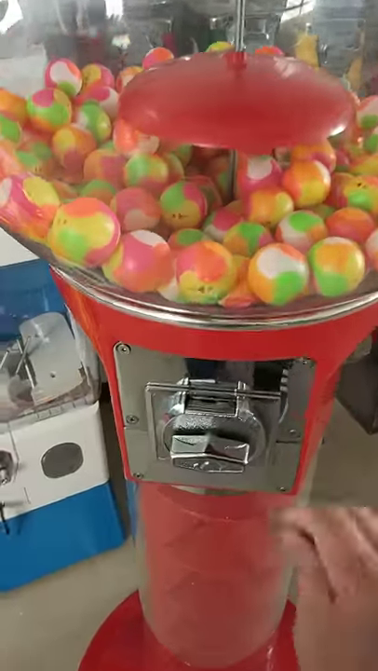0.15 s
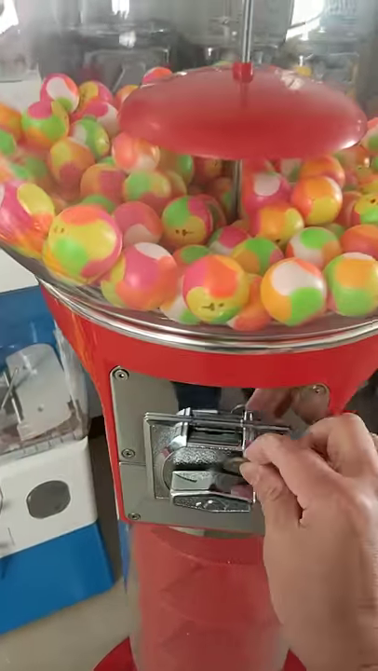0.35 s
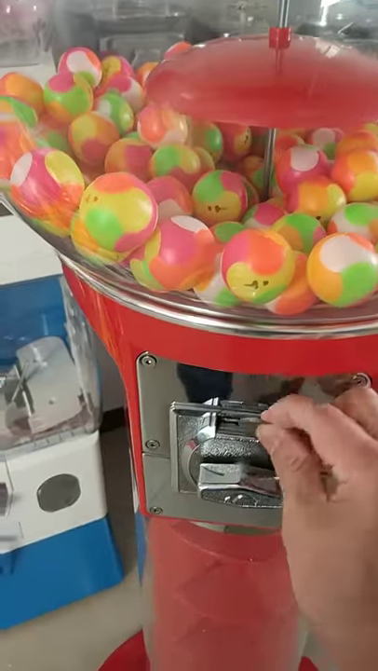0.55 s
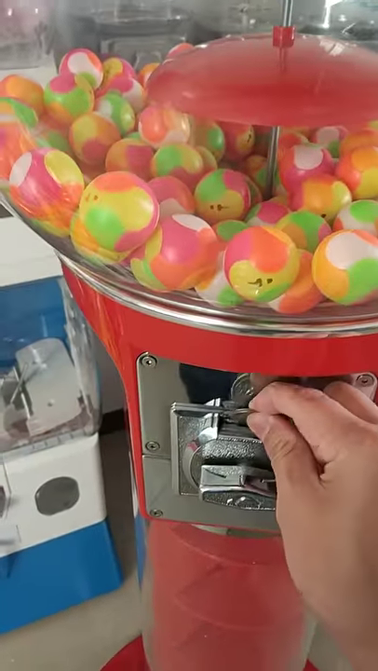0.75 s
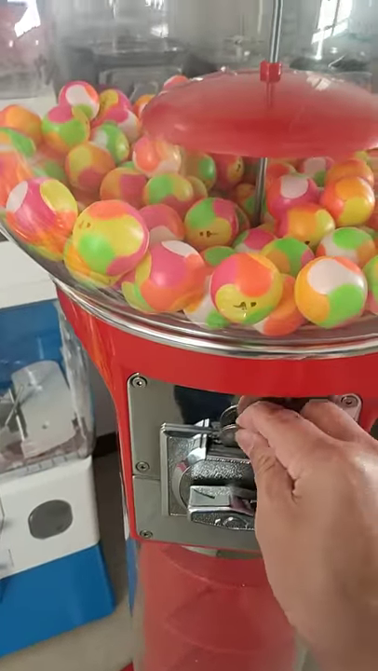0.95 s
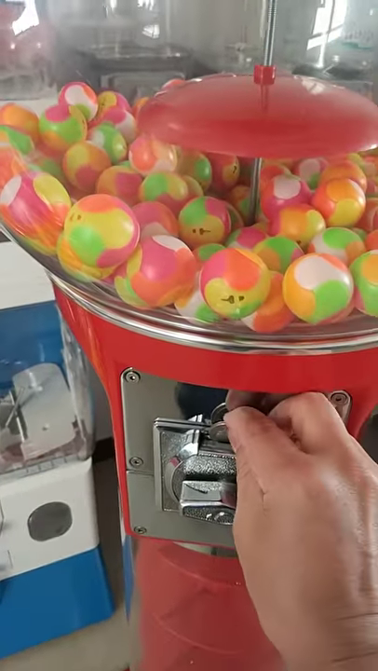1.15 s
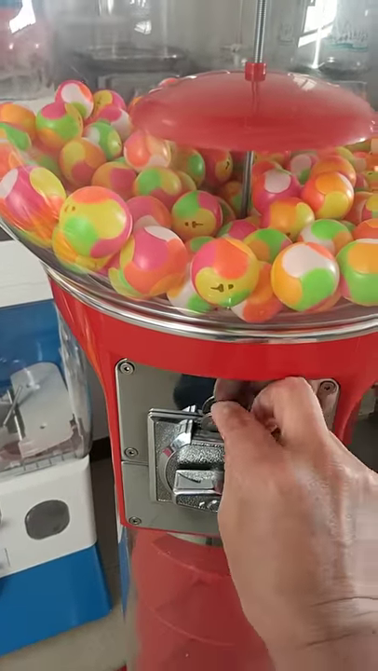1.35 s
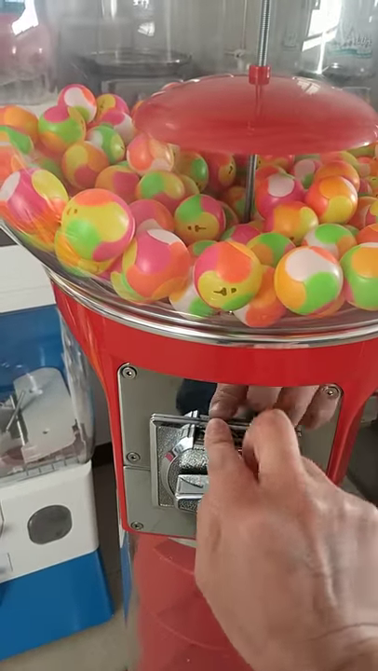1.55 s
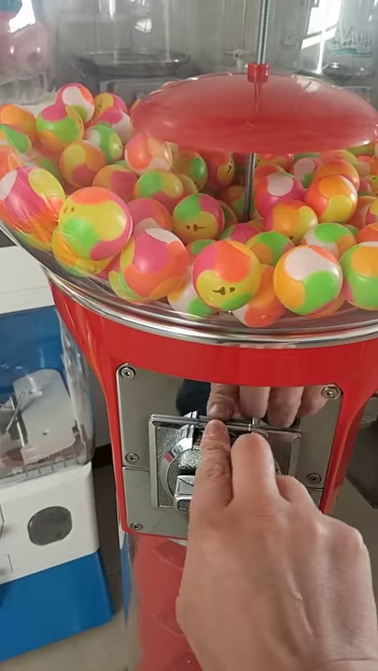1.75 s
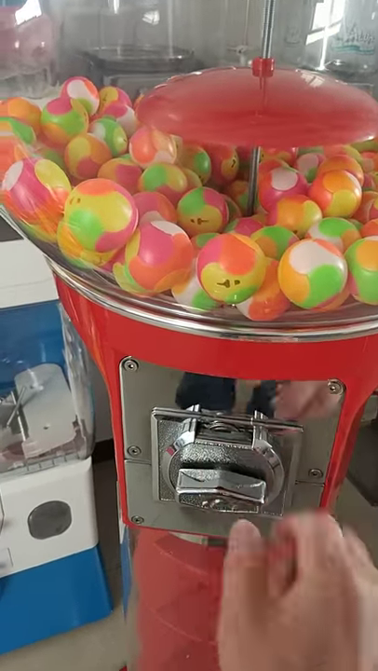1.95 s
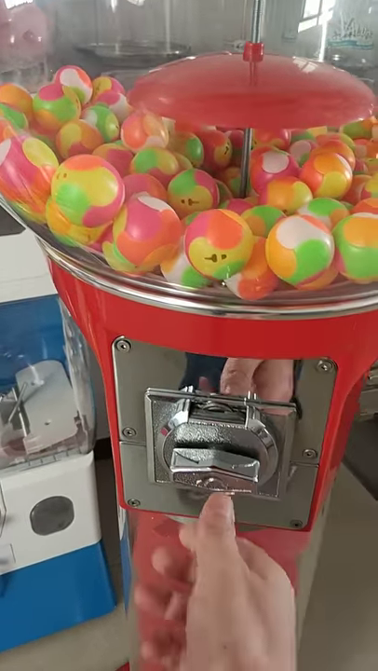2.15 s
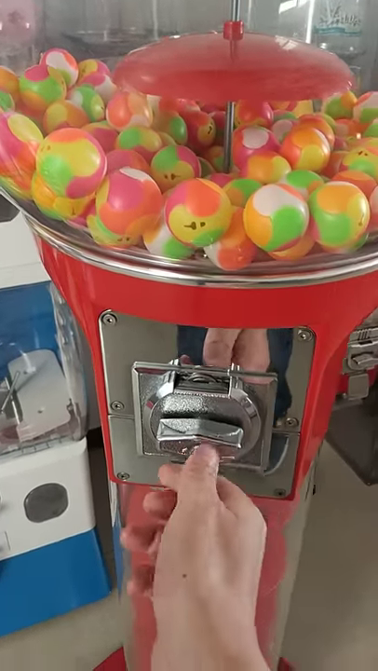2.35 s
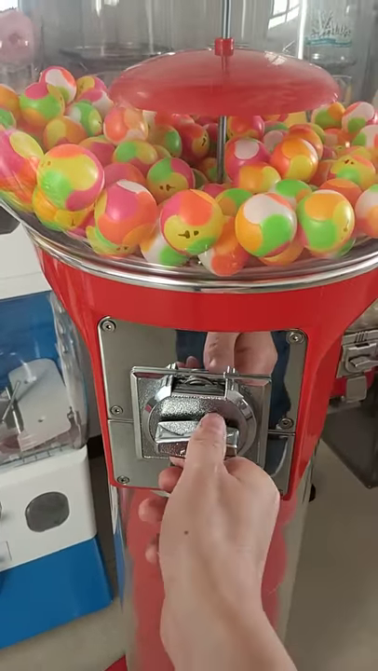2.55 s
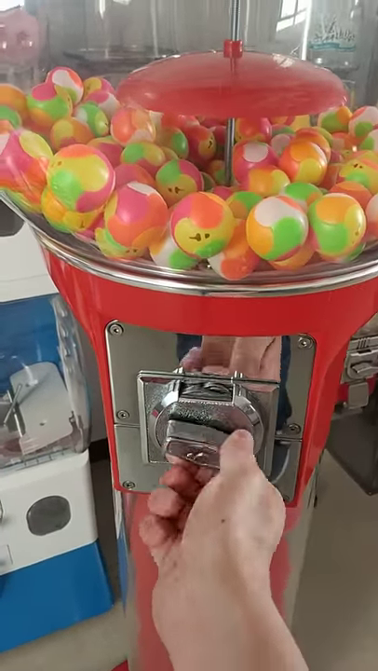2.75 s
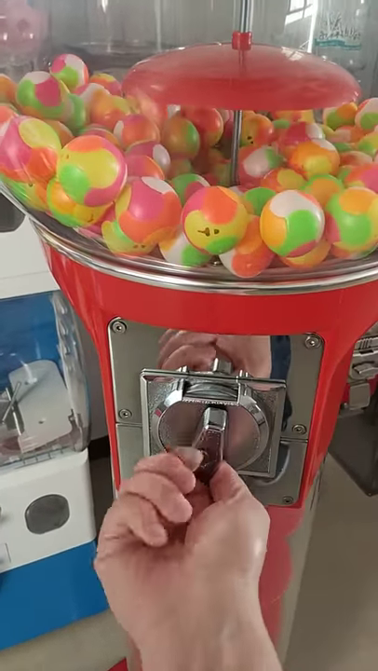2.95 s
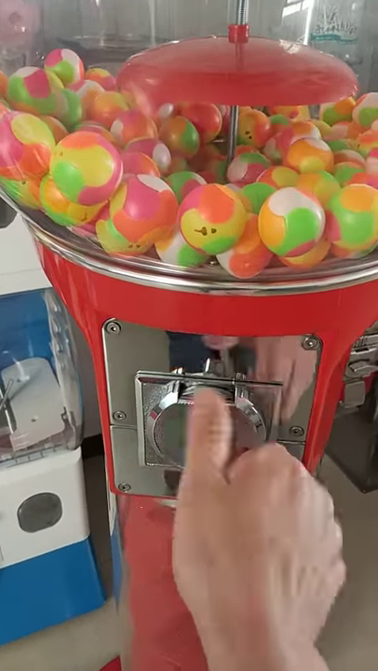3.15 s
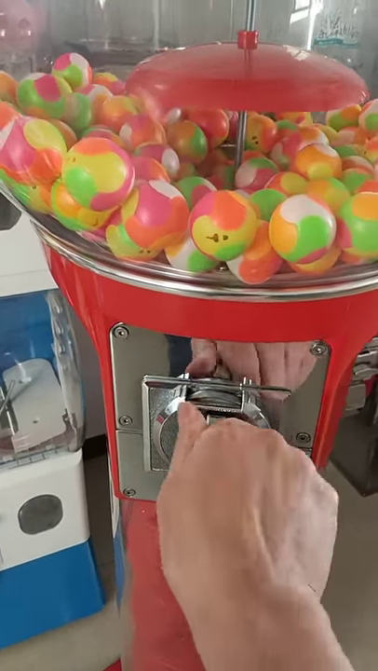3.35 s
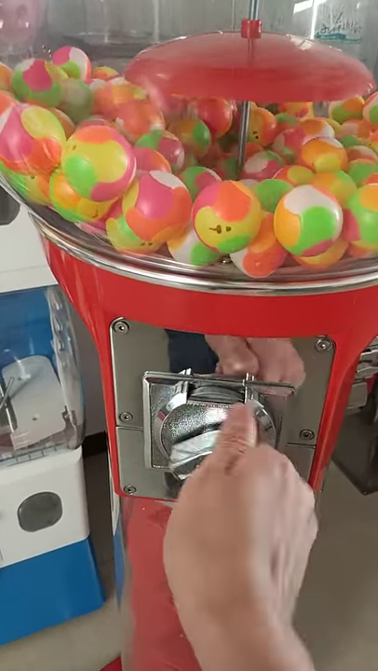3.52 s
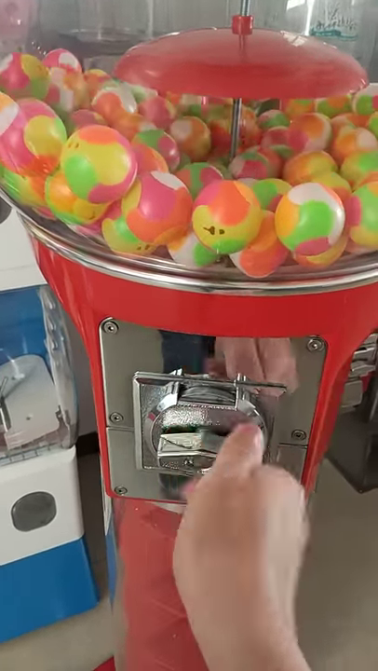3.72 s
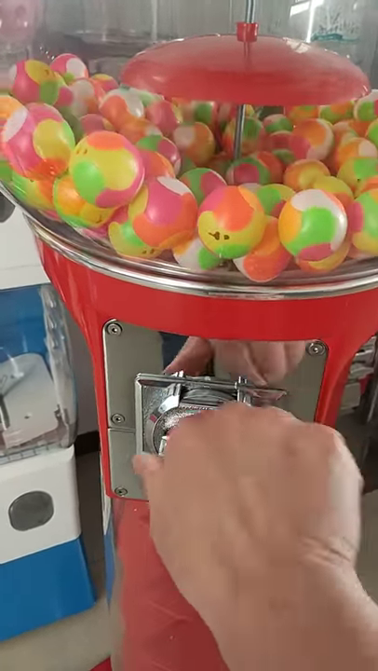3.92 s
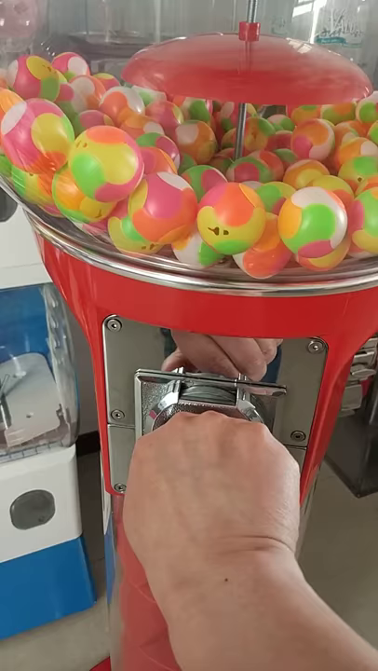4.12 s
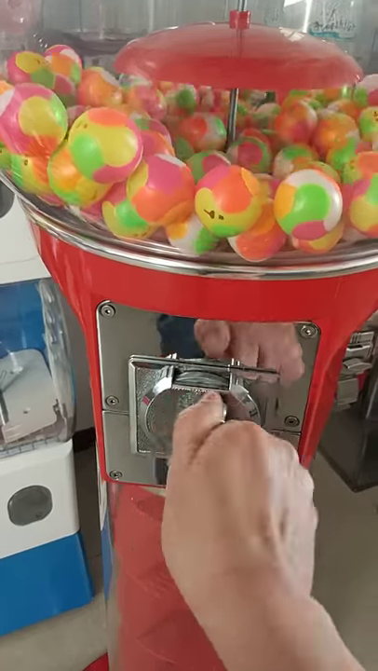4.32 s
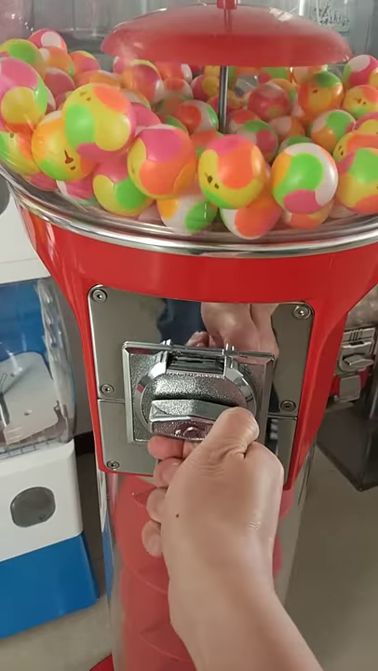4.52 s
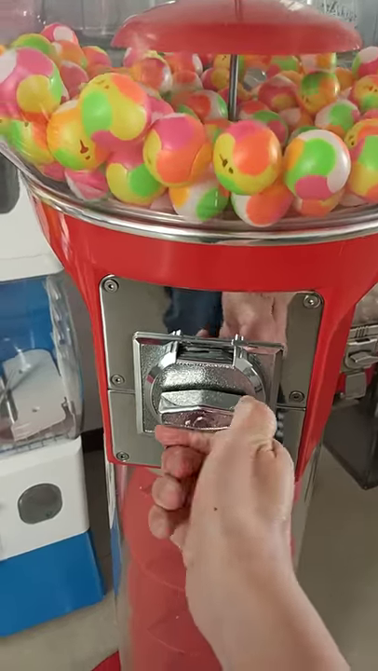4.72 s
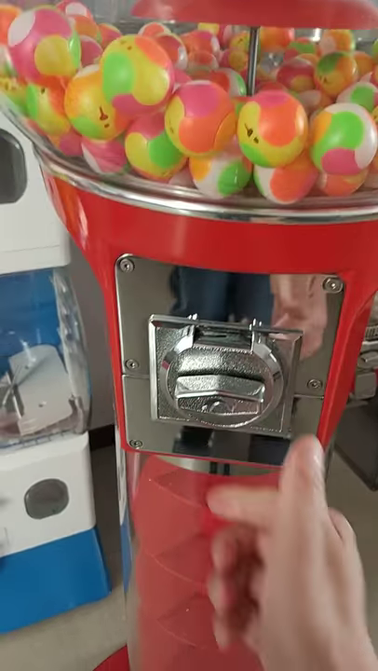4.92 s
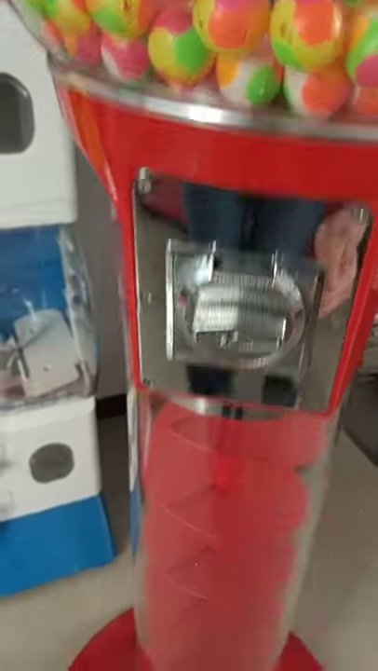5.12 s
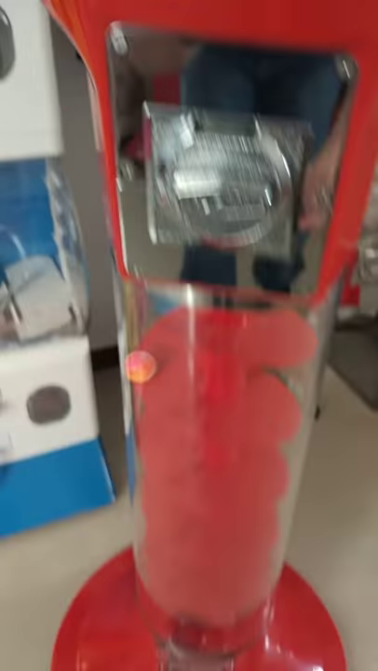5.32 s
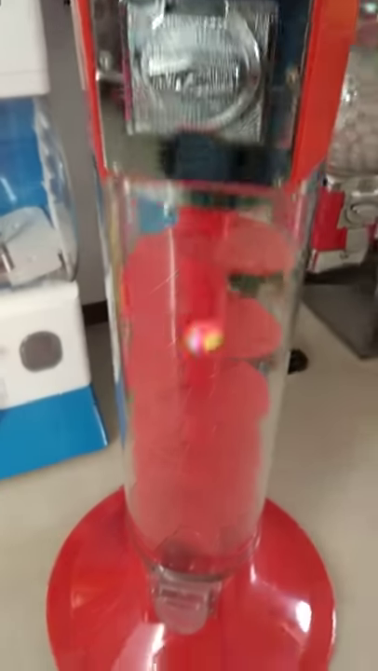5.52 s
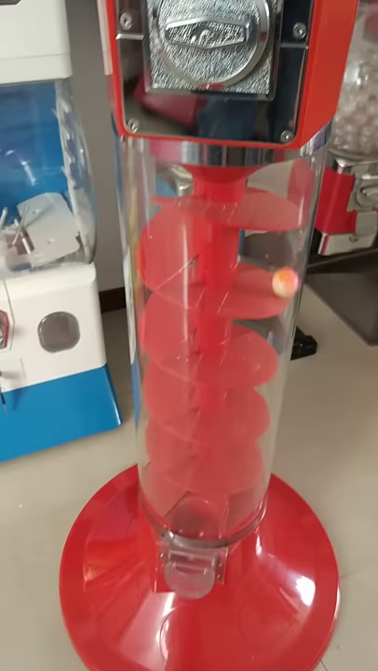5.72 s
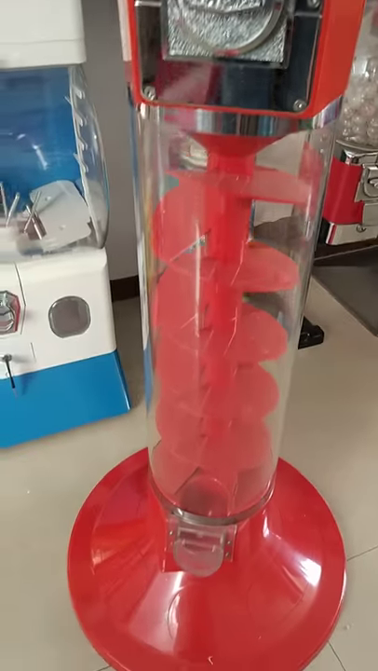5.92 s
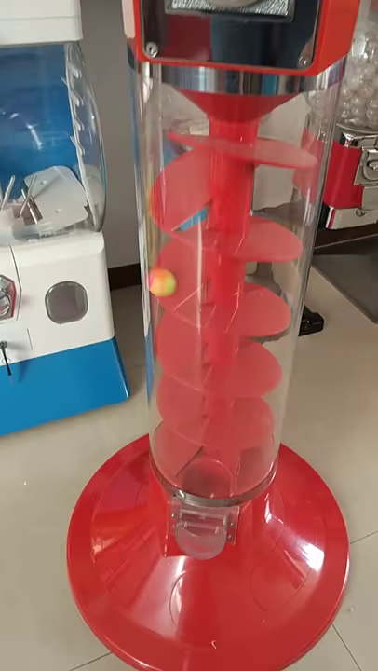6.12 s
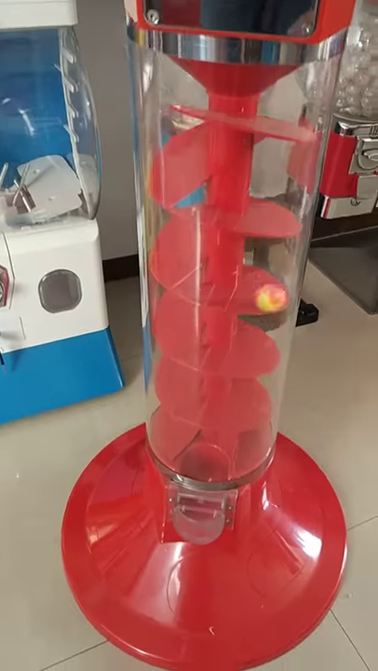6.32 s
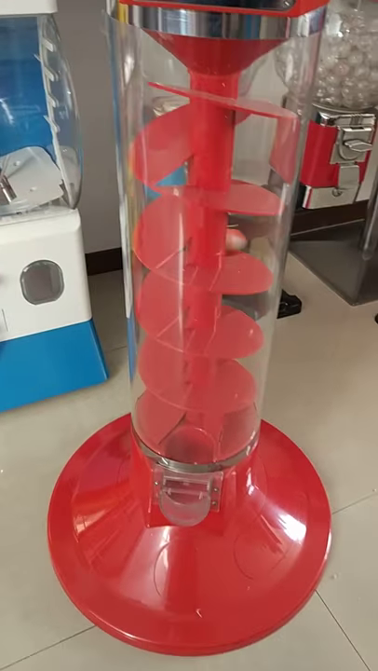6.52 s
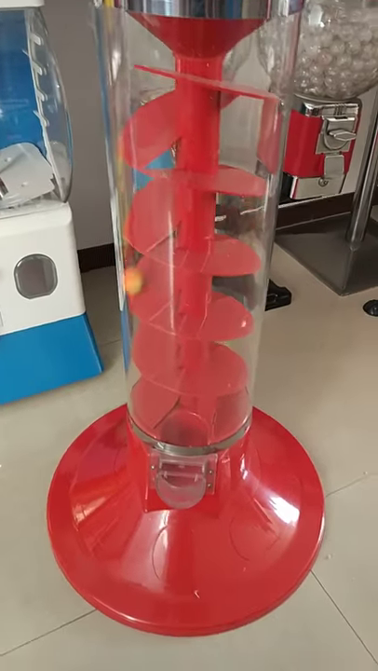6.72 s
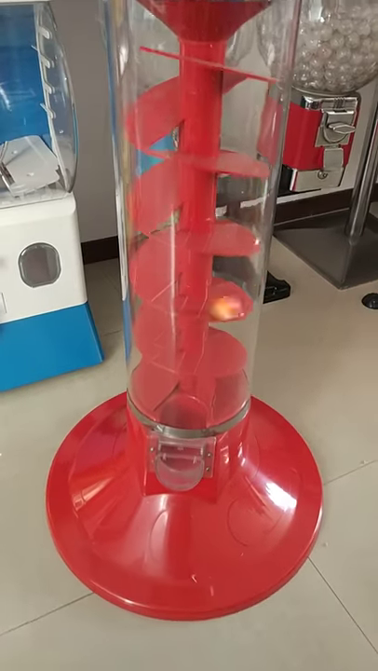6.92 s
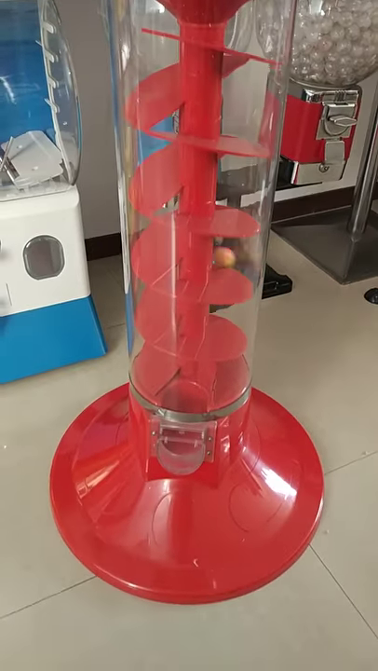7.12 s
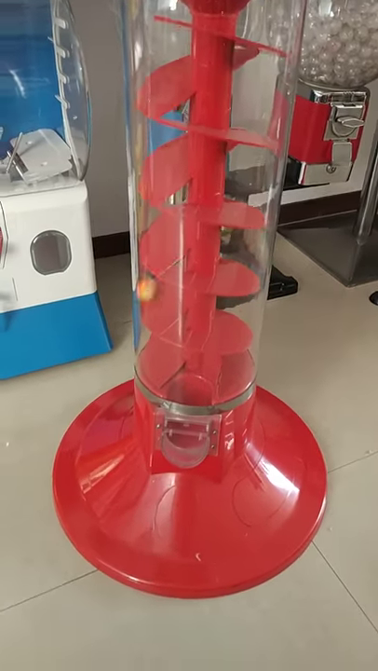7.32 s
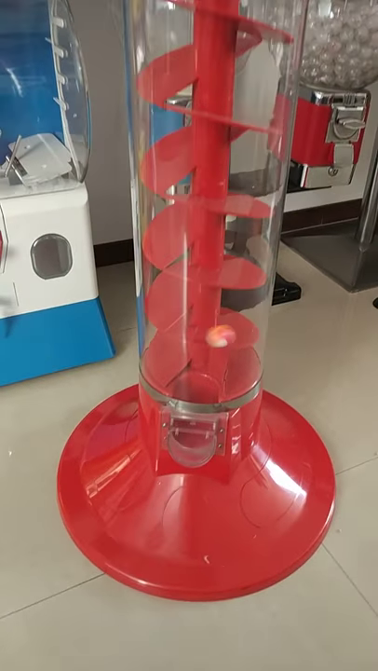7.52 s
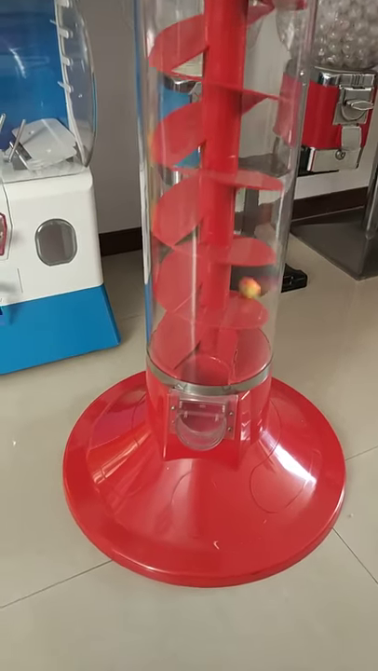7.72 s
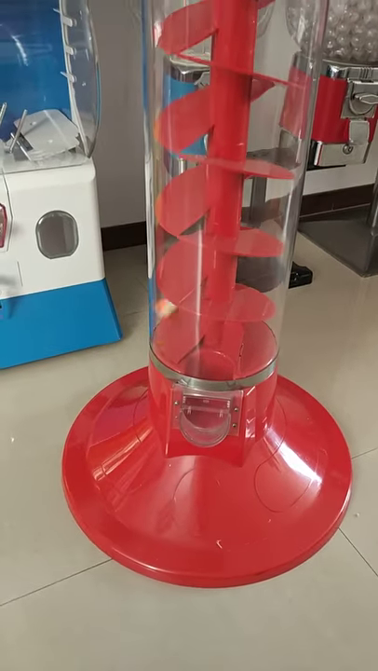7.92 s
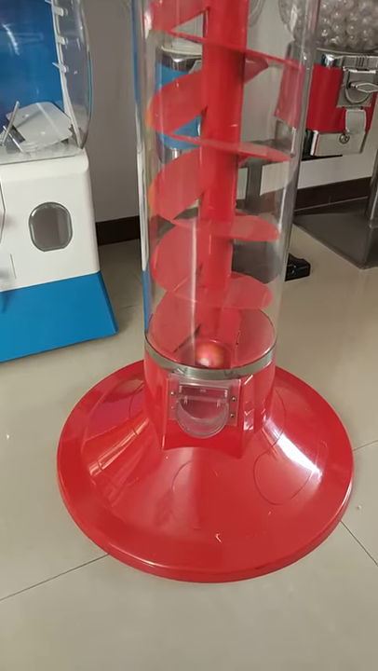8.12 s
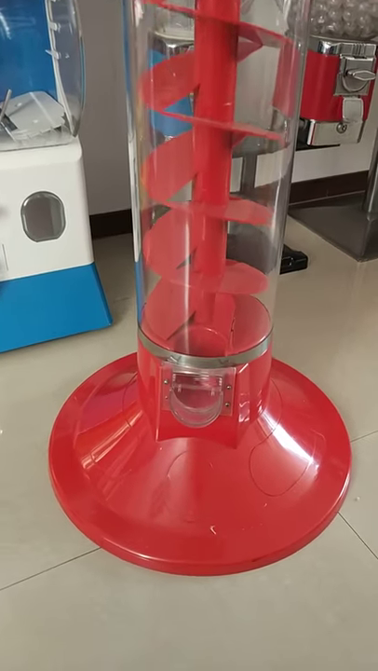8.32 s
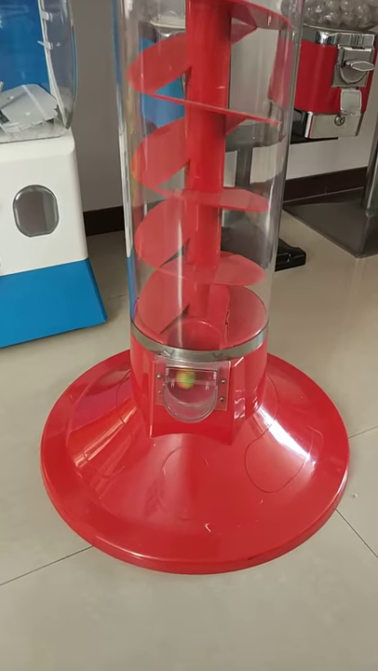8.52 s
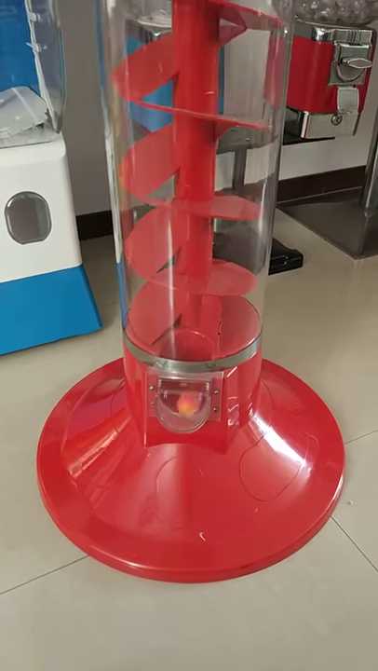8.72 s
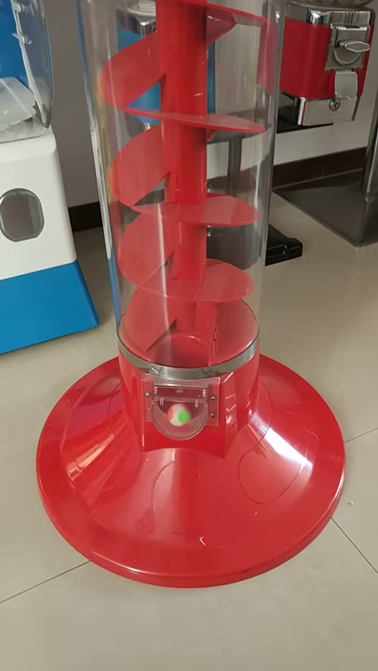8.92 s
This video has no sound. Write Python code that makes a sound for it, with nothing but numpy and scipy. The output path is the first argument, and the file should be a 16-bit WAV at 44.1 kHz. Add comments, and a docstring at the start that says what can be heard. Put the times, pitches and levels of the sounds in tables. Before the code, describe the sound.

A coin clinks into a gumball machine, the handle ratchets loudly, and a ball rattles down a plastic spiral into a metal flap.

```python
"""Spiral gumball machine in a hard showroom

A stereo pair on the machine, the left microphone brighter, the right fuller. A coin clinks and scrapes
into the slot and the handle is wrenched round in three goes: gears grind, the ratchet snaps, balls
tumble in the globe. One ball rolls down the plastic helix and drops against the metal outlet flap.
Behind it are room tone and a swishing sleeve; a limiter squashes the snaps."""
import sys
import numpy as np
from scipy import signal
from scipy.fft import rfft, irfft
from scipy.io import wavfile
from scipy.ndimage import uniform_filter1d, minimum_filter1d

SR = 44100
rng = np.random.default_rng(int(sys.argv[2]) if len(sys.argv) > 2 else 0)


def unload_wav(signal):
    """Save mono or channel-first audio to the path in sys.argv[1] as 16-bit WAV at rate SR, clipped to [-1, 1]."""
    wavfile.write(
        sys.argv[1],
        SR,
        np.round(np.clip(np.atleast_2d(signal).T, -1, 1) * 32767).astype(np.int16),
    )


N = 395136

# The showroom's reverberation. Each row: frequency in Hz, seconds to die by 60 dB.
ROOM_T60 = [(200, 0.37), (600, 0.33), (1500, 0.37), (4000, 0.33), (10000, 0.34), (16000, 0.23)]
# How alike the two microphones hear. Each row: frequency in Hz, left-right correlation.
MIC_CORRELATION = [(150, 0), (400, 0.66), (900, 0.1), (2000, 0), (16000, 0)]
# The tilt between the microphones. Each row: frequency in Hz, left over right in dB.
MIC_BALANCE = [(250, -4), (800, -2.5), (2000, 2), (7500, 0), (11000, 8.5), (15000, 10)]

# Spectra of the hush, cloth, rolling and rubbing. Each row: frequency in Hz, relative density in dB.
AIR_COLOUR = [(59, -64), (100, -19.5), (215, 2), (335, -3), (406, -3.5), (452, -6), (547, -6.5), (891, -4),
              (1200, -13.5), (16000, -24)]
SWISH_COLOUR = [(300, 1), (1500, 1.5), (3500, 7.5), (6000, 2.5), (10000, 8), (13000, 2.5), (16000, 0.5)]
ROLL_COLOUR = [(170, -2.5), (260, 0), (800, 1), (1800, -3), (3300, -3), (5000, -22), (9800, -6.5),
               (16000, -17)]
RATTLE_COLOUR = [(1500, -23), (3800, 0), (5200, 5), (7200, 7), (9800, 10.5), (11500, -4), (12800, 7),
                 (14200, -11), (15500, -17)]
SCRAPE_COLOUR = [(300, -33), (600, 6), (2300, 1), (2800, 3.5), (4200, -1), (5400, -2), (6300, -6),
                 (8300, -10), (10500, -1.5), (16000, -13)]
GRIND_COLOUR = [(88, -12.5), (150, -52), (226, -4.5), (566, -2.5), (1940, -19), (2180, -15), (4080, -23.5),
                (12700, -29.5), (16000, -37)]
# The tone of a blow on each part. Each row: frequency in Hz, gain in dB.
PLASTIC_COLOUR = [(220, -16.5), (600, -6.5), (1800, -5.5), (2900, -1.5), (4800, -5), (7000, 0),
                  (10000, -0.5), (15500, -6.5)]
METAL_COLOUR = [(250, 3), (600, 0.5), (1500, 2.5), (3000, 1), (5000, -2), (9500, 0), (12000, 0.5),
                (13800, -6), (15500, 0)]
HOUSING_COLOUR = [(200, -2), (450, -2), (800, -7.5), (1500, 5), (4000, -9.5), (9500, -10), (15500, -24)]
PAWL_COLOUR = [(250, -3), (1000, 2.5), (1900, 1), (3000, 2), (4800, 0.5), (7300, 0.5), (8400, 3), (9600, 4),
               (12500, 1), (14300, -3.5), (15500, -1)]

# Where each part rings. Each row: frequency in Hz, width in Hz, gain in dB.
HELIX_MODES = [(554, 30, -5), (790, 60, -9), (1200, 100, -0.5), (1420, 140, -13), (2450, 700, -6.5),
               (3040, 500, -6), (3510, 260, -5)]
FLAP_MODES = [(800, 100, 5), (1070, 160, 5), (2160, 360, 4), (2950, 300, -8), (4110, 160, -2),
              (6150, 330, 4.5), (8000, 470, 6.5), (9700, 540, -2), (12550, 400, 11.5), (13600, 400, 8),
              (15050, 800, 10)]
COIN_MODES = [(5070, 260, 4.5), (5960, 190, 0), (8753, 40, -17), (10300, 400, -4), (12500, 220, -4),
              (15050, 350, 1)]
SLOT_MODES = [(2350, 300, 0), (5030, 200, 7), (5360, 165, 13), (9050, 450, 3), (10400, 400, 3),
              (11420, 180, 12), (12080, 240, 8), (15050, 350, 3)]
SLOT_LIP_MODES = [(3320, 270, 3), (4120, 690, 10.5), (6240, 220, 14.5)]
SQUEAL_MODES = [(9700, 250, -4), (10850, 360, -2), (12700, 350, -4), (14900, 410, -2)]
GLOBE_MODES = [(1030, 130, 4), (1585, 71, 8), (2190, 110, 0), (2680, 90, 0), (2800, 89, -23),
               (3110, 17, -7)]
HOUSING_MODES = [(240, 50, -11), (294, 120, -15), (456, 8.7, 2), (570, 12, 4.5), (850, 16, 3)]
STOP_MODES = [(222, 5, 26), (326, 7, 21), (355, 7, 21), (1210, 78, 2.6)]
PAWL_MODES = [(1085, 55, -6), (2400, 320, -4), (7240, 510, -8.5), (10600, 400, -11)]

# The sleeve moves. Each row: middle in seconds, length in seconds, level in dB.
SWISHES = [(0.228, 0.94, -60), (5.176, 0.68, -49.5), (5.92, 0.58, -48.5), (6.83, 0.47, -44.5),
           (7.352, 0.25, -44.5), (8.95, 0.36, -50)]
# The ball hops down the helix and settles; it strikes the flap; the handle meets its stop. Each row:
# start in seconds, strength, bass and treble in dB, strongest resonance in Hz, its prominence in dB.
BALL_HOPS = [(4.973, -6, -13.5, -13.5, 762, 3), (5.235, -2, -10, -16.5, 2960, 0),
             (5.248, -12.5, -9, -8.5, 3000, 3), (5.5125, -7.5, -17, -13.5, 1270, 11),
             (5.577, -3.5, -36, -35, 3060, 5), (5.868, -12.5, -23, -21, 3050, 11),
             (5.926, -9.5, -6.5, -27, 1160, 20), (5.962, -6.5, -12, -13, 1130, 6),
             (6.041, -8, -32, -30, 3230, 17), (6.2835, -1.5, -10, -18, 3487, -4),
             (6.302, -9, -12, -10, 10300, 15), (6.328, -10.5, -17, -13, 3200, 3),
             (6.402, -9.5, -15, -5.5, 3770, -9), (6.478, -17, -8, -8, 9900, 0),
             (6.545, -15, -19, -15, 9500, -2), (6.6, -10.5, -16, -15, 1160, 4),
             (6.922, -7.5, -23, -21, 1195, 23), (7.1363, -12, -6, -18, 1170, 27),
             (7.1669, -7, -22, -13, 3130, 19), (7.3, -12.5, -18, -6, 3420, 3),
             (7.5306, -3, -15, -22, 1200, 7), (7.59, -4, -32, -13.5, 4120, 26),
             (7.858, -9, -20, -16, 3420, 4), (7.88, -2, -22, -12.5, 3000, 4),
             (7.912, -1, -17, -21, 1260, 3), (7.933, -15, -16, -22, 1260, 18),
             (7.968, -3.5, -17, -30, 3420, 11), (7.9872, -6, -20, -13, 1060, 22),
             (8.0292, -7, -18, -6, 9100, 25), (8.1013, -6.5, -8.5, -12, 9500, 3),
             (8.171, -6.5, -11, -5.5, 9600, 16), (8.475, -10, -14, -17, 2120, 8),
             (8.506, -15.5, -26, -16, 4130, 9), (8.649, -13, -12, -17, 4720, -3),
             (8.796, -10, -18, -16, 5780, 13), (8.802, -8.5, -14.5, -10.5, 2390, 8),
             (8.927, -17, -15, -20, 2400, 4)]
FLAP_HITS = [(8.2053, 1, -18.5, -5, 3300, 4), (8.302, 5.5, -20.5, -7.5, 4150, 12)]
STOP_HITS = [(4.648, 13, -31, -7, 1150, 14), (4.654, 5.5, -24, -0.5, 9960, 12),
             (4.662, -2, -25, 4, 12400, 9), (4.693, 3.5, -38, -12, 1210, 5)]
# The coin clinks against the slot. Each row: start in seconds, strength, bass and treble in dB,
# strongest resonance in Hz, its prominence in dB, chatter in seconds.
COIN_CLINKS = [(0.3322, -11, -10.5, 5, 8700, 18, 0.0036), (0.3693, -9, -13, 3, 8750, 9, .002),
               (0.375, -5, -22, -7, 3700, 10, 0.0044), (0.404, 8.5, -12.5, -13, 1180, 6, 0.0018),
               (0.414, 2, -9, -13, 1500, 1, .008), (0.523, -9, -34, 7, 6440, 20, 0.0025),
               (0.549, -15, -32, 3, 11100, -3, 0.00088), (0.631, -11, -15, -20, 2590, -1, 0.0033),
               (0.7363, -8, -16, -15, 2530, -2, 0.0053), (0.8154, -4, -22, -4, 6280, 27, 0.0026),
               (0.832, -7.5, -29, -11.5, 5000, 7, 0.0022), (0.844, -4.5, -16.5, -25, 2630, 5, 0.0034),
               (1.8593, -14.5, -7, -11.5, 2000, 2, 0.0027)]
# The coin is pressed along the plate, ever harder until it slips free.
# Each row: start and length in seconds, final level in dB, swell in dB, squeal against rub in dB.
COIN_SCRAPES = [(0.426, 0.083, -38, 3, -11), (0.509, 0.045, -33, 4, -2.5), (0.826, 0.039, -47, 4, -28),
                (1.566, 0.017, -31.5, 17, -14)]
# The coin glances off the slot wall, then lands. Each row: start in seconds, strength in dB.
COIN_DROP = [(1.5842, -11), (1.5889, -3)]
# Balls fall against each other in the globe.
# Each row: start in seconds, strength, bass and treble in dB, strongest resonance in Hz.
GLOBE_FALLS = [(3.7745, 10.5, -6.5, -18, 1530), (3.802, 19.5, -26, -16, 2870),
               (3.8221, 16.5, -37, -16, 2970), (3.836, 14.5, -34, -15, 2950),
               (3.8795, 10.5, -28, -38, 2040), (3.905, 8, -15, -36, 2650), (3.926, 3, -11, -32, 2900),
               (3.9668, 4, -9.5, -20.5, 1060), (4.045, 11.5, -17.5, -15, 1770), (4.051, 10, -13, -20, 2000),
               (4.0573, 12, -7.5, -23, 2330), (4.1321, 17, -15, -12, 2420), (4.81, -0.5, -10, -13.5, 2380)]
# The hand loads the gears until they give. Each row: start, loading time and length in seconds, peak in dB.
HANDLE_TURNS = [(2.779, 0.18, 0.31, -29), (3.531, 0.065, 0.2, -28.5), (4.257, 0.027, 0.34, -27)]
# Fingers, loose handle and gears knock on the housing.
# Each row: start in seconds, strength in dB, hardness in dB (flesh below 0, steel above).
HOUSING_KNOCKS = [(0.403, 6, -8), (0.957, -12.5, -1.5), (1.5352, -13, 0), (2.3478, -15, -3.5),
                  (2.4048, -26.5, -11.5), (2.551, -13, -3.5), (2.7278, -21.5, -16), (2.807, -13.5, 4.5),
                  (2.842, -22, 4), (2.863, -6.5, -0.5), (2.88, -9, -11.5), (2.93, 3.5, 1), (3.3661, -1, -6),
                  (3.4862, -15, -6), (3.537, -10.5, -3), (3.5555, -3, -3), (3.783, 15, -3.5),
                  (4.2527, 0, -6), (4.2848, 4, -1.5), (4.293, 5, -2), (4.4491, 5, -3), (4.5, -3.5, 2),
                  (4.763, -6.5, -2.5)]
# The pawl snaps over the ratchet teeth. Each row: start in seconds, strength in dB, left over right
# in dB, strongest resonance in Hz, its prominence in dB, chatter in seconds.
PAWL_SNAPS = [(2.9585, 24, -1.5, 7040, -2, 0.0014), (2.9916, 23.5, -5.5, 12200, -11, .003),
              (3.6257, 21, -2, 9500, -6, 0.0023), (3.6376, 24, -5, 9400, 1, .002),
              (4.3097, 26.5, -9, 9400, 1, 0.0027), (4.3256, 26.5, -0.5, 11100, 0, 0.0035),
              (4.5595, 27.5, -2, 13200, 0, 0.0029)]


def amp(db):
    return 10 ** (np.asarray(db) / 20)


def unit_rms(x):
    return x / np.sqrt(np.mean(x ** 2) + 1e-20)


def curve_at(points, hz):
    """A curve's value, its points joined on a log-frequency axis."""
    point_hz, value = np.transpose(points)
    return np.interp(np.log(hz + 1), np.log(point_hz), value)


def panned(x, left_db):
    return x * amp([[left_db / 2], [-left_db / 2]])


def add(mix, start_s, sound):
    part = mix[:, max(round(start_s * SR), 0):][:, :sound.shape[1]]
    part += sound[:, :part.shape[1]]


def impulse(start_s, db=0):
    """One sharp push, alike in both channels."""
    push = np.zeros((2, N))
    add(push, start_s, np.full((2, 1), amp(db)))
    return push


def coloured(x, colour, size=4096):
    """Minimum-phase filter with the given spectrum."""
    hz = abs(np.fft.fftfreq(size, 1 / SR))
    log_gain = np.log(amp(np.maximum(curve_at(colour, hz), -100)))
    taps = np.fft.ifft(np.exp(np.conj(signal.hilbert(log_gain)))).real
    return signal.oaconvolve(x, taps[None, :size // 2], axes=1)[:, :x.shape[1]]


def resonances(x, modes):
    """What the given modes sing when x drives them."""
    return sum(amp(db) * signal.lfilter(*signal.iirpeak(hz, hz / width, SR), x + 1e-15)
               for hz, width, db in modes)


def stereo_noise(size=N, envelope=1):
    """Noise at the pair: partly shared in the low mids, independent in the treble."""
    mid, side = rfft(envelope * rng.standard_normal((2, size)))
    correlation = curve_at(MIC_CORRELATION, np.fft.rfftfreq(size, 1 / SR))
    mid, side = mid * np.sqrt((1 + correlation) / 2), side * np.sqrt((1 - correlation) / 2)
    return irfft([mid + side, mid - side], size)


def slips(per_s, spread_db, contact_s):
    """Tiny random catches of one surface on another, a few of them large."""
    sizes = amp(spread_db * np.minimum(rng.exponential(1, N), 4))
    catches = sizes * (rng.random(N) < per_s / SR)
    power = signal.oaconvolve(catches ** 2, np.exp(-np.arange(512) / SR / contact_s))[:N]
    return stereo_noise(envelope=np.sqrt(abs(power)))


def stroke(start_s, rise_s, length_s, peak_db, swell_db, ease_db_per_s, release_db_per_s):
    """Gain of one rubbing stroke: it swells to its peak, eases, and dies quickly once let go."""
    t = np.arange(N) / SR - start_s
    climb_db = -swell_db * np.clip(1 - t / rise_s, 0, 1)
    fall_db = ease_db_per_s * np.maximum(t - rise_s, 0) + release_db_per_s * np.maximum(t - length_s, 0)
    return (t >= 0) * amp(np.maximum(peak_db + climb_db - fall_db, -150))


def blows(colour, start_s, db, bass_db, treble_db, ring_hz, ring_db, chatter_s=0, *,
          left_db, decay_s, bass_extra_s, width_hz):
    """Each blow is a brief clatter of crowded modes; where it lands decides which one stands out."""
    t, out = np.arange(6000) / SR, np.zeros((2, N))
    bands = [signal.butter(3, edges_hz, "band", fs=SR, output="sos")
             for edges_hz in ((190, 855), (950, 4200), (5200, 14750))]
    decays_s = (decay_s + bass_extra_s, decay_s * 1.74, decay_s)
    rows = np.broadcast(start_s, db, bass_db, treble_db, left_db, ring_hz, ring_db, chatter_s)
    for start, strength, bass, treble, left, hz, prominence, chatter in rows:
        noise, clatter = stereo_noise(len(t)), 0
        for band, band_db, tau in zip(bands, (bass, -8, treble), decays_s):
            envelope = np.exp(-np.maximum(t - chatter, 0) / tau)
            burst = signal.sosfilt(band, noise * envelope + 1e-15)
            burst += resonances(burst, [(hz, width_hz, prominence)])
            clatter += amp(band_db) * burst / np.linalg.norm(burst, axis=1, keepdims=True)
        add(out, start, panned(amp(strength) * clatter, left))
    return coloured(out, colour)


def showroom(x, wet_db, left_db, t60_share=1, drift_s=1.3):
    """Adds the room's dense reflections; hand, ball and listener move, so two tails trade places."""
    source = x.sum(0, keepdims=True) / np.sqrt(2)
    drift = 2 * np.pi * np.arange(N) / SR / drift_s
    for share in (np.cos(drift), np.sin(drift)):
        hz, t, spectrum = signal.stft(stereo_noise(32768), SR, nperseg=256)
        decay = amp(-60 * t / t60_share / curve_at(ROOM_T60, hz)[:, None])
        tail = signal.istft(spectrum * decay, SR, nperseg=256)[1]
        tail *= 1 - np.exp(-(np.arange(tail.shape[1]) / SR / 0.0024) ** 2)  # reflections build up
        echo = signal.oaconvolve(share * source, tail / np.linalg.norm(tail[0]), axes=1)[:, :N]
        x = x + panned(amp(wet_db) * echo, left_db)
    return x


def room_tone(level_db=-57):
    """The steady hush of the showroom."""
    return panned(amp(level_db) * unit_rms(coloured(stereo_noise(), AIR_COLOUR)), left_db=1)


def sleeve():
    """Off to the left, smooth cloth slides on itself in soft swells."""
    t = np.arange(N) / SR
    swell = sum(amp(db) * np.exp(-((t - middle) / (length / 4.64)) ** 2)
                for middle, length, db in SWISHES)
    return panned(swell * unit_rms(coloured(stereo_noise(), SWISH_COLOUR)), left_db=6)


def rolling(start_s=5.17, outlet_s=8.17, gather_s=0.57, entry_speed=0.15, run_out_db_per_s=72):
    """The ball rumbles down the helix, gathering speed and rattling more brightly as it goes."""
    t = np.arange(N) / SR
    speed = 1 - (1 - entry_speed) * np.exp(-np.maximum(t - start_s, 0) / gather_s)  # top speed is 1
    on_helix = (t > start_s) * amp(-run_out_db_per_s * np.maximum(t - outlet_s, 0))
    rumble = unit_rms(coloured(slips(per_s=340, spread_db=7.5, contact_s=0.0019), ROLL_COLOUR))
    # each small bump wakes a different mode of the spiral
    hollow = unit_rms(sum(resonances(slips(per_s=42, spread_db=3, contact_s=0.0012), [mode])
                          for mode in HELIX_MODES))
    # the ball wobbles, so its rumble swells and its ticks come in clusters
    wobble = unit_rms(uniform_filter1d(rng.standard_normal(N), size=2000))
    body = amp(-53.5 + 1.1 * wobble) * (0.7 * rumble + hollow)
    ticks = amp(2 * wobble) * slips(per_s=70, spread_db=3, contact_s=0.0005)
    rattle = amp(-52 + 4.5 * (t - outlet_s)) * unit_rms(coloured(ticks, RATTLE_COLOUR))
    # the hollow housing drones, less as the ball descends away from it
    drone = amp(-61 - 1.5 * (t - start_s)) * unit_rms(resonances(rumble, [(212.7, 19, 0)]))
    return panned(on_helix * (speed ** 0.97 * (body + rattle) + drone), left_db=0.5)


def seam(start_s=7.589, spin_s=0.0695, spins=5):
    """On the last lap the ridge round the ball ticks on the helix once per spin."""
    return blows(PLASTIC_COLOUR, start_s + spin_s * np.arange(spins), db=-14.5, bass_db=-4, treble_db=-3,
                 ring_hz=9300, ring_db=11, left_db=2, decay_s=0.0037, bass_extra_s=0.0011, width_hz=1300)


def helix():
    """The ball rolls and hops down the plastic spiral and settles, with plenty of room on it."""
    hops = blows(PLASTIC_COLOUR, *np.transpose(BALL_HOPS),
                 left_db=3, decay_s=0.0034, bass_extra_s=0.0012, width_hz=260)
    return showroom(rolling() + seam() + hops, wet_db=1, left_db=3)


def flap():
    """The ball drops into the outlet and strikes the metal flap, which pings."""
    hits = blows(METAL_COLOUR, *np.transpose(FLAP_HITS), chatter_s=0.0011,
                 left_db=0.5, decay_s=0.0036, bass_extra_s=0.0029, width_hz=300)
    return showroom(hits + resonances(hits, FLAP_MODES), wet_db=-3, left_db=3, t60_share=0.87)


def coin(ping_hz=5350):
    """The coin clinks and scrapes over the plate, making the slot's lips sing, then drops home."""
    catches = slips(per_s=600, spread_db=2, contact_s=0.0005)
    rub = unit_rms(coloured(catches + resonances(catches, SLOT_LIP_MODES), SCRAPE_COLOUR))
    squeal = unit_rms(resonances(catches, SQUEAL_MODES))
    scrape = 0
    for start, length, db, swell_db, squeal_db in COIN_SCRAPES:
        pressure = stroke(start, length, length, db, swell_db, ease_db_per_s=0, release_db_per_s=1400)
        scrape += pressure * (rub + amp(squeal_db) * squeal)
    clinks = blows(METAL_COLOUR, *np.transpose(COIN_CLINKS),
                   left_db=1.5, decay_s=0.003, bass_extra_s=0.005, width_hz=380)
    clinks += resonances(clinks, COIN_MODES)
    drop = blows(METAL_COLOUR, *np.transpose(COIN_DROP), bass_db=-3.5, treble_db=0, ring_hz=1110,
                 ring_db=0, left_db=-4, decay_s=0.0037, bass_extra_s=0.0034, width_hz=770)
    drop += resonances(drop, SLOT_MODES)
    ping = resonances(impulse(COIN_DROP[-1][0]), [(ping_hz, 70, 17)])  # the coin's own note as it seats
    direct = clinks + panned(scrape, left_db=1.5) + drop + ping
    return showroom(direct, wet_db=-6, left_db=2.5, t60_share=0.85)


def globe():
    """The turning wheel stirs the heap in the hollow globe; each fall sets the neighbours clacking."""
    falls = blows(PLASTIC_COLOUR, *np.transpose(GLOBE_FALLS), ring_db=2,
                  left_db=2.5, decay_s=0.0049, bass_extra_s=0.013, width_hz=210)
    fall_power = signal.oaconvolve((falls ** 2).mean(0), signal.windows.hann(4400) / 2200)[:N]
    clacks = unit_rms(coloured(slips(per_s=80.4, spread_db=3, contact_s=0.0014), ROLL_COLOUR))
    heap = falls + amp(-15) * np.sqrt(abs(fall_power)) * clacks
    return showroom(heap + amp(-9) * resonances(heap, GLOBE_MODES), wet_db=-2.5, left_db=3)


def handle():
    """Gear teeth grind under the hand, and the slack in the shaft knocks the housing."""
    teeth = unit_rms(coloured(slips(per_s=380, spread_db=2.1, contact_s=0.002), GRIND_COLOUR))
    load = sum(stroke(*turn, swell_db=18, ease_db_per_s=40, release_db_per_s=307)
               for turn in HANDLE_TURNS)
    start_s, db, hardness_db = np.transpose(HOUSING_KNOCKS)
    bass_db = -5 - 0.24 * db - 0.95 * hardness_db  # strong, hard contacts are brief and thud less
    knocks = blows(HOUSING_COLOUR, start_s, db, bass_db, treble_db=hardness_db - 0.5, ring_hz=536,
                   ring_db=-18, left_db=2, decay_s=0.0085, bass_extra_s=0.0022, width_hz=16)
    knocks += resonances(knocks, HOUSING_MODES)
    return showroom(panned(load * teeth, left_db=0.5) + knocks, wet_db=-6.5, left_db=2.5)


def ratchet():
    """The steel pawl's very loud snaps fill the room; the handle lands on its stop, ringing the housing."""
    start_s, db, left_db, ring_hz, ring_db, chatter_s = np.transpose(PAWL_SNAPS)
    snaps = blows(PAWL_COLOUR, start_s, db, bass_db=-11.5, treble_db=-2.5, ring_hz=ring_hz,
                  ring_db=ring_db, chatter_s=chatter_s,
                  left_db=left_db, decay_s=0.0015, bass_extra_s=0.0006, width_hz=280)
    snaps += resonances(snaps, PAWL_MODES)
    stop = blows(PAWL_COLOUR, *np.transpose(STOP_HITS),
                 left_db=3, decay_s=0.0051, bass_extra_s=0.0039, width_hz=170)
    housing_ring = resonances(impulse(STOP_HITS[0][0], db=8), STOP_MODES)
    return showroom(snaps + stop + housing_ring, wet_db=-6.5, left_db=0)


def scene():
    """The machine, the sleeve and the room as they reach the microphones."""
    return coin() + handle() + ratchet() + globe() + helix() + flap() + sleeve() + room_tone()


def record(dry, shelf_hz=174, ceiling_db=-2, recovery_db_per_s=135, top_hz=16000):
    """Steep bass shelf, two unlike microphones, limiter and band limit."""
    x = signal.sosfilt(signal.butter(6, shelf_hz, "high", fs=SR, output="sos"), dry) + amp(-16) * dry
    left_db = curve_at(MIC_BALANCE, np.fft.rfftfreq(N, 1 / SR))
    x = irfft(rfft(x) * amp([left_db / 2, -left_db / 2]), N)
    # the limiter looks ahead, clamps each snap and lets its echo swell back
    over_db = np.maximum(20 * np.log10(abs(x).max(0) + 1e-9) - ceiling_db, 0)
    over_db = -minimum_filter1d(-over_db, size=65)
    recovery_db = np.arange(N) / SR * recovery_db_per_s
    held_db = np.maximum.accumulate(over_db + recovery_db) - recovery_db
    x = x / amp(uniform_filter1d(held_db, size=49))
    low_pass = signal.firwin(255, top_hz, window=("kaiser", 9), fs=SR)
    return signal.oaconvolve(x, low_pass[None], "same")


dry = scene()
out = record(dry)
unload_wav(out)
```